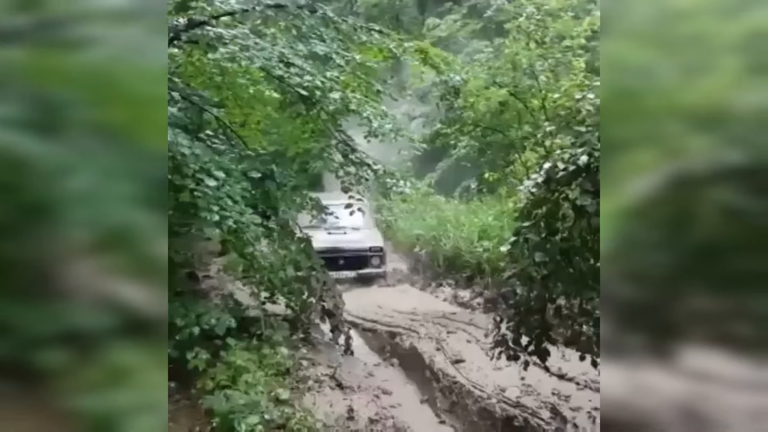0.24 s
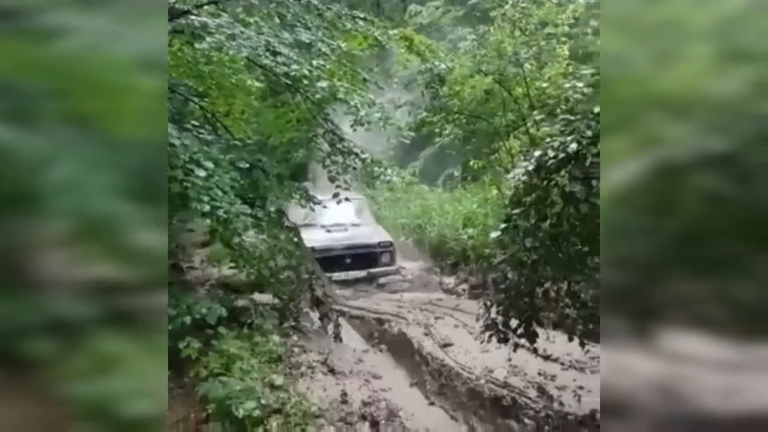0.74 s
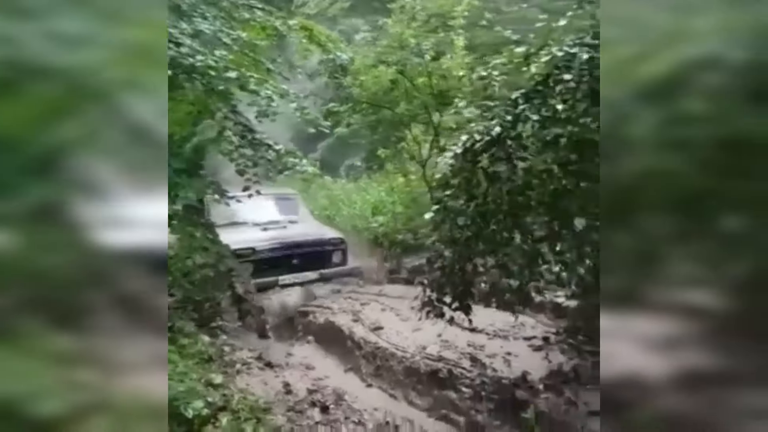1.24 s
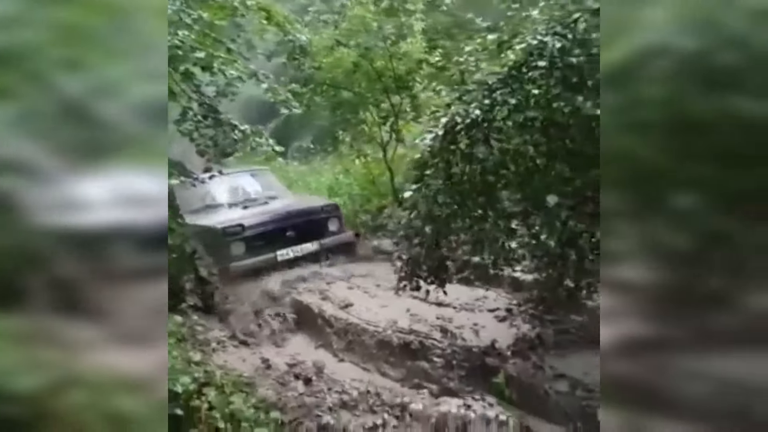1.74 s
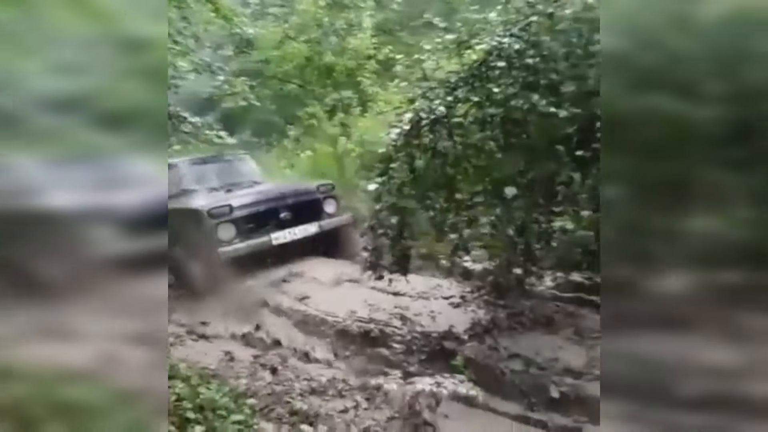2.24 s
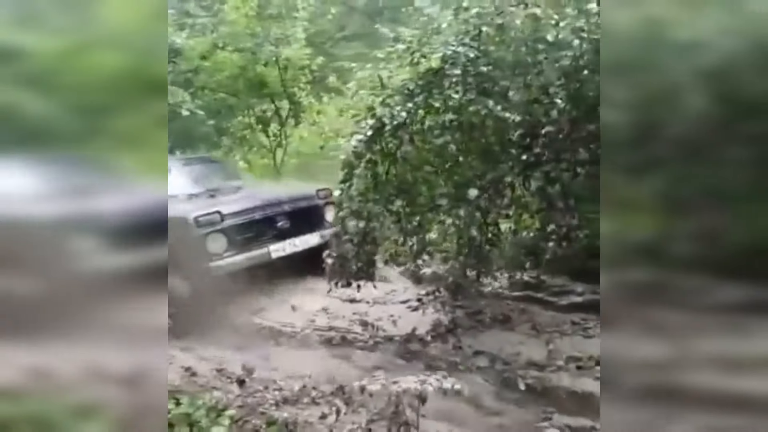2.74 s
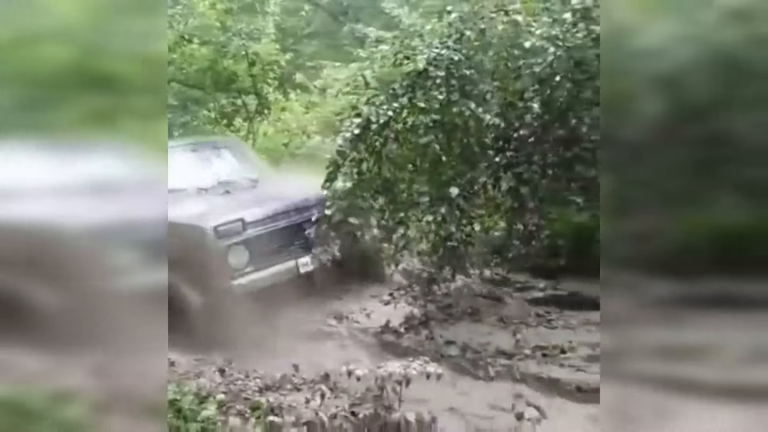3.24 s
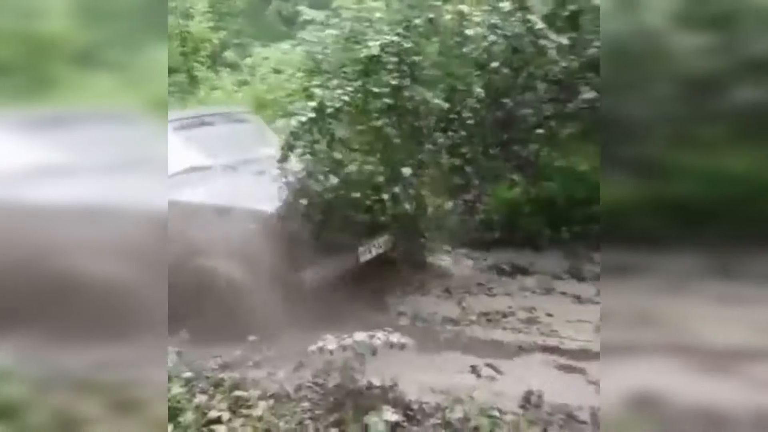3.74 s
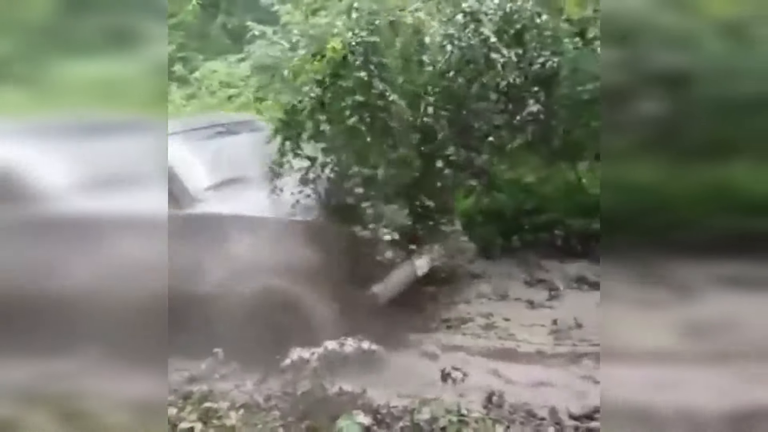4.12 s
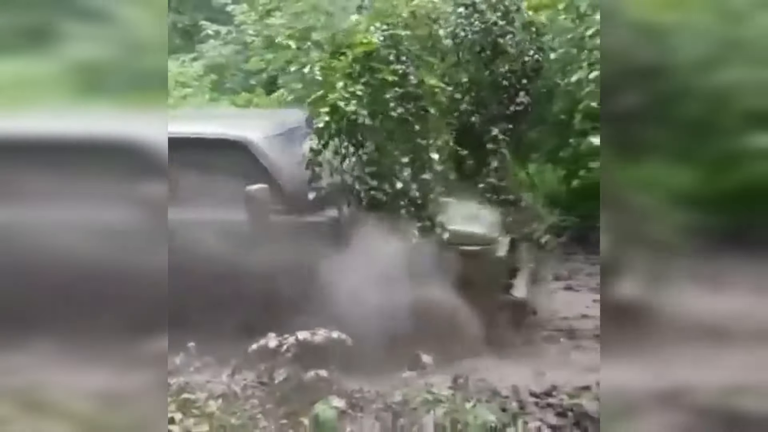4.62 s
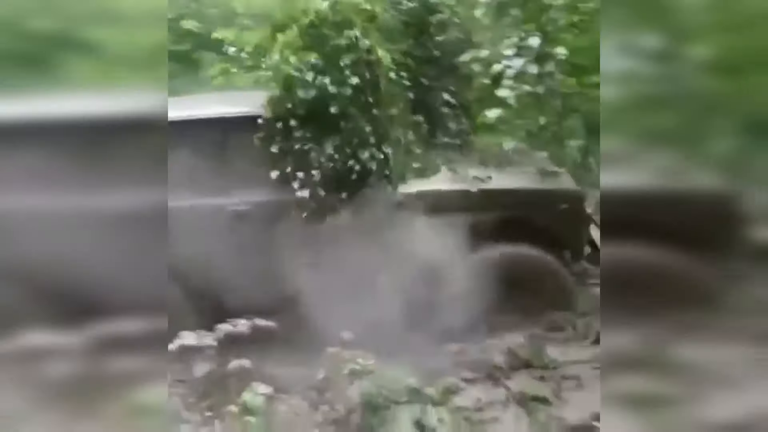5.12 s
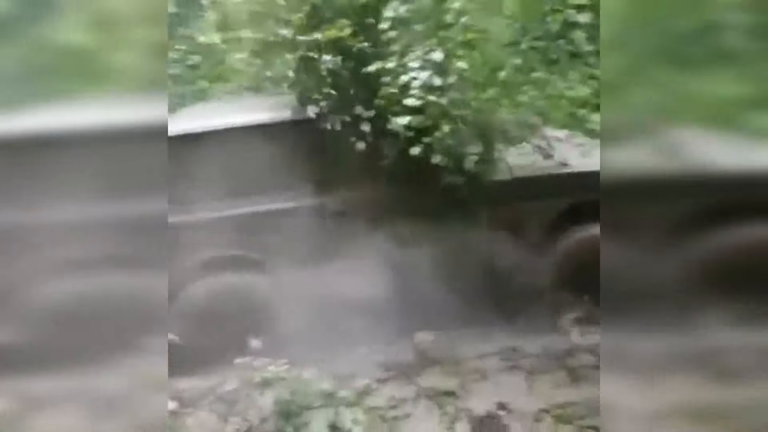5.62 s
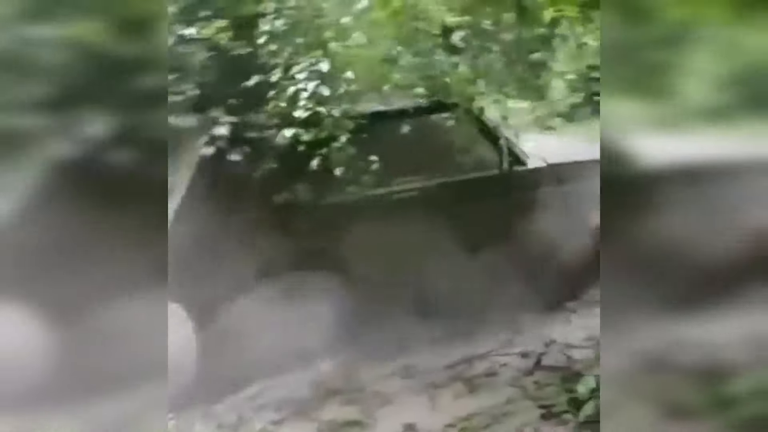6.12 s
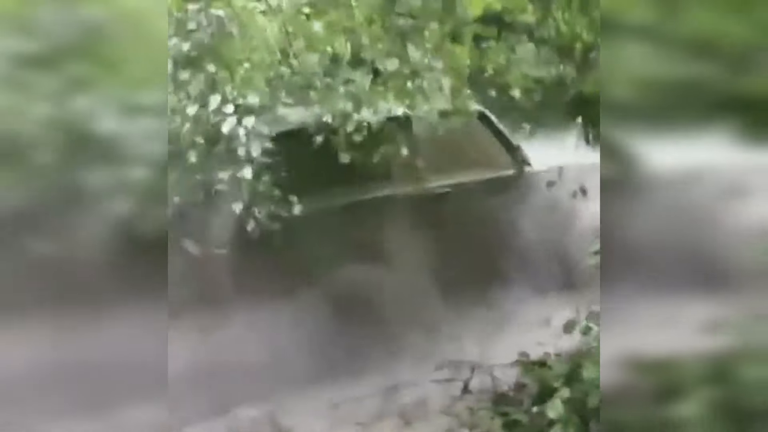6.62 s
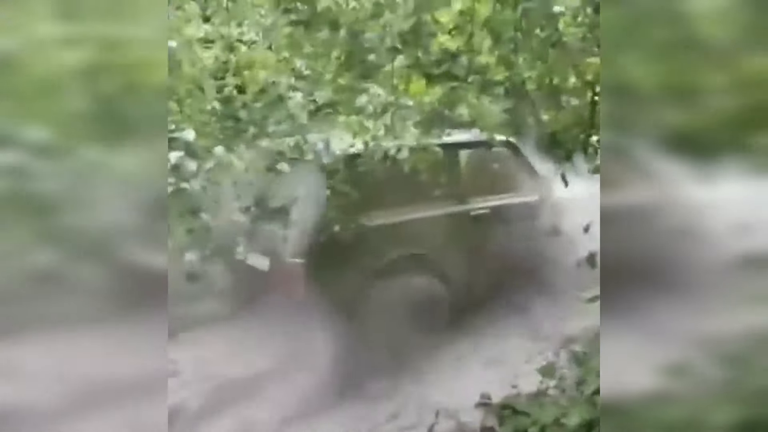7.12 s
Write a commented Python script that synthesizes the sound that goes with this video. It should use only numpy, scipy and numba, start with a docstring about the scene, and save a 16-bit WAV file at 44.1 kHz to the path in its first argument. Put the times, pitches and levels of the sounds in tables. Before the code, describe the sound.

After a brief silence, wet mud churns and a leaf-muffled engine cuts in, then the off-roader roars slowly past at full throttle, booming and spraying slurry.

```python
"""Churning mud and an engine still muffled by leaves cut in, then an off-roader claws past at full throttle.
The four firings of each cycle drive every engine tone: a near-pure pipe boom climbing towards 190 a second,
rough overtones that flutter and ring out, a clattering block, a moving rasp and brief accessory whines.
The wheels' slurry is made of dense random impacts, coloured and split into bands, with short ringing grains;
it surges with each dig, while a hollow from the ground echo drifts through the treble."""
import sys
import numpy as np
from scipy import signal
from scipy.fft import rfft, irfft
from scipy.io import wavfile
from scipy.ndimage import map_coordinates
from numba import njit

SR = 44100
rng = np.random.default_rng(int(sys.argv[2]) if len(sys.argv) > 2 else 0)


def to_wav(sig):
    """Store sig (one row per channel, or 1-D mono) as 16-bit WAV at the path in sys.argv[1].

    Samples outside -1..1 are clipped; the rate is SR.
    """
    pcm = np.clip(np.atleast_2d(sig), -1, 1) * 32767
    pcm = np.round(pcm).astype(np.int16)
    wavfile.write(sys.argv[1], SR, pcm.T)  # frames by channels


N = 325458
TIME = np.arange(N) / SR  # seconds
FULL_BOOM_DB = -13  # the boom with the pipe in full song


def undb(db):
    """Decibels to gain."""
    return 10 ** (np.asarray(db) / 20)


def unit(x):
    """Scale to rms 1."""
    return x / np.sqrt(np.mean(x ** 2))


def curves(table):
    """Each column after the time column, drawn as straight lines with one value per sample."""
    s, *columns = np.transpose(table)
    return [np.interp(TIME, s, column) for column in columns]


def swell(s, length_s):
    """A smooth bell-shaped rise and fall, 1 at time s and 1/e at length_s to either side."""
    return np.exp(-((TIME - s) / length_s) ** 2)


def walk(rate):
    """Smooth random wandering with rms 1: noise that dies away above about rate in Hz."""
    hz = np.arange(N // 2 + 1) * SR / N
    spectrum = rfft(rng.standard_normal(N)) * np.exp(-(hz / rate) ** 2)
    return unit(irfft(spectrum, N))


def colour(x, points):
    """Filter by an outline of (Hz, dB) points, joined on a logarithmic pitch scale."""
    hz, db = np.transpose(points)
    bins = np.arange(N // 2 + 1) * SR / N + 1  # the 1 avoids log(0)
    return irfft(rfft(x) * undb(np.interp(np.log(bins), np.log(hz), db)), N)


def band(x, lo_hz, hi_hz):
    """Band-pass with steep sides."""
    edges = [lo_hz, min(hi_hz, SR / 2 - 1)]
    return signal.sosfilt(signal.butter(4, edges, "band", fs=SR, output="sos"), x)


@njit
def resonance(x, hz, width):
    """State-variable band-pass whose centre may move; gain 1 at the centre, width in Hz."""
    y, b, low = np.empty(len(x)), 0., 0.
    for i in range(len(x)):
        g, k = np.tan(np.pi * hz[i] / SR), width / hz[i]
        v = (b + g * (x[i] - low)) / (1 + g * (g + k))
        b, low, y[i] = 2 * v - b, low + 2 * g * v, k * v
    return y


def passing():
    """How openly the engine is heard (dB, lower with distance and leaves) and which end shows (1 nose, -1 tail)."""
    nearest_s, closest_m, crawl_m_s = 4.63, 2.75, 0.83
    foliage_db, clears_s, clearing_s = -16, 1.09, 0.21  # leaves screen the engine until it noses out
    ahead_m = crawl_m_s * (nearest_s - TIME)
    distance_m = np.hypot(closest_m, ahead_m)
    hidden = (1 - np.tanh((TIME - clears_s) / clearing_s)) / 2
    open_db = 20 * np.log10(closest_m / distance_m) + foliage_db * hidden
    return open_db, ahead_m / distance_m


def digging():
    """Extra effort in dB as the wheels dig in: each dig builds up, holds and lets go."""
    # Each row: start in seconds, rise in seconds, end of the hold in seconds, strength in dB.
    digs = [(.36, 0.23, 0.83, 0.5), (1.25, 0.75, 2.2, 4), (3.38, 0.062, 3.7, 3), (3.76, 0.3, 4.23, 3.5),
            (5.0, .55, 6.1, 2.5)]
    release_s = 0.18
    effort_db = 0
    for start, rise, end, db in digs:
        build = np.clip((TIME - start) / rise, 0, 1)
        let_go = np.clip(1 - (TIME - end) / release_s, 0, 1)
        effort_db = effort_db + db * build * let_go
    return effort_db


def patter(rate, spread_db, ring_s):
    """Dense impacts, rate a second, a few much bigger than the rest; each is a burst of noise
    whose energy decays over ring_s."""
    struck = rng.random(N) < rate / SR
    size = undb(spread_db * np.minimum(rng.exponential(size=N), 5))
    hits = struck * size * rng.standard_normal(N)
    energy = signal.lfilter([1], [1, -np.exp(-1 / (ring_s * SR))], hits ** 2)
    return unit(np.sqrt(energy) * rng.standard_normal(N))


def ringing_grains(ring_s, spread_db, glide, count):
    """Short ringing grains at random pitches through the slurry, each rising very slightly."""
    # Tone of the grains together. Each row: frequency in Hz, relative level in dB.
    grain_tone = [(350, -14), (600, 0), (1000, -1.5), (1700, -1.5), (2700, -2), (3400, -8.5), (5000, -10.5),
                  (8000, -16.5)]
    out, age = np.zeros(N + SR), np.arange(int(.07 * SR)) / SR
    for when, pitch, size, life in rng.random((count, 4)):
        hz = 350 * (8000 / 350) ** pitch  # 350 to 8000 Hz, even in octaves
        decay_s = ring_s * (.5 + life)
        shape = np.exp(-age / decay_s) * (1 - np.exp(-2 * age / decay_s))
        ring = np.sin(2 * np.pi * hz * age * (1 + glide * age))
        start = int(when * N)
        out[start:start + len(age)] += undb(spread_db * size) * shape * ring
    return unit(colour(out[:N], grain_tone))


def gulps(width_hz):
    """Pockets of slurry collapse under the tyres: swells of noise, each through a narrow hollow resonance."""
    # Each row: centre in seconds, pitch in Hz, swell length in seconds, level in dB.
    pockets = [(0.608, 420, 0.063, -27.5), (1.615, 360, 0.14, -30.5), (4.18, 305, .07, -37)]
    out = 0
    for s, hz, length, db in pockets:
        hollow = resonance(rng.standard_normal(N), np.full(N, float(hz)), float(width_hz))
        out = out + undb(db) * unit(hollow) * swell(s, length)
    return out


def mud(firings, dig_db, boom_db, facing, spray_db, grains_db, rumble_db, pulsing):
    """Slurry torn up by the treads: random impacts split into thuds, lumps, churning, splashes and spray,
    with grains and a plume; most layers surge with the digs, and the middle carries the engine's pulsing rush."""
    # Flow between digs. Each row: time in seconds, churning in dB, splashing in dB.
    flow = [(0.23, -33, -30.5), (0.85, -29, -30), (1.5, -31.5, -31.5), (2.6, -36.5, -32.5),
            (4.9, -36.5, -30.5), (6.6, -33, -34.5), (7.3, -42, -36.5)]
    # Heavy slop under the body between digs. Each row: time in seconds, level in dB.
    body_slop = [(.23, -41), (.9, -42), (1.35, -40.5), (1.7, -42), (2.1, -41), (2.5, -50), (2.8, -44),
                 (3.3, -40.5), (3.9, -44), (4.25, -42), (4.55, -45), (5.0, -37), (5.5, -34.5), (6.1, -37.5),
                 (6.7, -41), (7.15, -46)]
    # Tone of the wet impacts. Each row: frequency in Hz, relative level in dB.
    slurry_tone = [(20, -22), (50, -12.5), (100, -11), (170, 11.5), (300, 11.5), (450, -6), (700, -4.5),
                   (1100, -5.5), (1700, -3), (2700, -5.5), (3400, -9.5), (5000, -14.5), (6500, -16.5),
                   (8300, -12.5)]
    # Dull thuds as the body drops into a rut. Each row: centre in seconds, level in dB.
    jolts = [(.28, -37), (1.6, -52), (2.08, -42), (3.54, -41), (3.78, -49), (4.18, -41), (5.82, -44)]
    jolt_s, front_rumble_db = 0.14, 2.5  # swell length; extra rumble when the grille faces the listener
    plume_s, plume_width_s, plume_db = 5.55, .7, -41  # fine spray off the near wheel

    churn_db, splash_db = curves(flow)
    lump_db, = curves(body_slop)
    rumble = undb(rumble_db + 0.17 * (boom_db - FULL_BOOM_DB) + front_rumble_db * facing)
    thuds = rumble + sum(undb(db) * swell(s, jolt_s) for s, db in jolts)

    slop = colour(patter(rate=11000, spread_db=0.5, ring_s=0.0087), slurry_tone)
    drops = colour(patter(rate=9000, spread_db=4.0, ring_s=0.0083), slurry_tone)
    grains = ringing_grains(ring_s=0.0096, spread_db=9.5, glide=0.33, count=3000)
    mist = patter(rate=9000, spread_db=2.5, ring_s=.005)
    # pulses at the firing rate and at half of it
    rush = 1 + pulsing * (np.sin(2 * np.pi * firings) + .6 * np.sin(np.pi * firings))

    layers = [
        (band(slop, 22, 125), thuds * undb(1.2 * walk(7.2))),
        (band(slop, 154.0, 402), undb(lump_db + 1.2 * dig_db + 1.0 * walk(3.0))),
        (band(slop, 424, 1112) * rush, undb(churn_db + 1.0 * dig_db + 0.4 * walk(11))),
        (band(slop, 1220, 3070) * rush, undb(splash_db + 1.19 * dig_db + 0.35 * walk(24))),
        (grains, undb(splash_db + grains_db + .8 * dig_db)),
        (band(mist, 2900, 5200), undb(plume_db) * swell(plume_s, plume_width_s)),
        (band(drops, 3340, 7900), undb(spray_db + 0.66 * splash_db + 1.02 * dig_db + 0.68 * walk(13)))]
    return sum(unit(x) * gain for x, gain in layers)


def whine(firings):
    """A belt-driven accessory sings far above the firing rate, a thin tone that swells and fades."""
    # Each row: centre in seconds, swell length in seconds, level in dB before the random wavering.
    swells = [(2.56, .04, -45), (2.77, 0.034, -40), (2.95, .055, -35.5), (3.14, .04, -38),
              (3.33, 0.07, -43), (4.65, 0.15, -42.5), (5.65, 0.16, -41)]
    level = sum(undb(db) * swell(s, length) for s, length, db in swells)
    angle = 2 * np.pi * 15.05 * firings
    return level * undb(2 * walk(18)) * np.sqrt(2) * np.sin(angle + 0.37 * walk(25))


def knocks(firings, scatter, count):
    """A random knock pattern that repeats every count firings and slowly changes, more with scatter."""
    size = 1024  # points in one pattern
    place = firings / count * size
    fresh = rng.standard_normal((int(place[-1] / size) + 2, size))
    keep = np.clip(1 - scatter, 0, .98)
    cycles = signal.lfilter([1], [1, -keep], fresh, axis=0).ravel()
    return map_coordinates(cycles, [place], order=3)


def clatter(firings, db):
    """Valves and combustion, repeating every four firings, as the whole block radiates them."""
    # Tone of the block. Each row: frequency in Hz, relative level in dB.
    block_tone = [(250, -36), (440, -18.5), (560, 3), (800, -4.5), (1400, -0.5), (2000, -1.5), (2800, -4.5),
                  (3400, -12.5), (5000, -12.5), (6300, -17), (9000, -43)]
    valves = knocks(firings, scatter=.12, count=4)
    return undb(db) * unit(colour(valves, block_tone))


def rasp(firings, width_hz):
    """Pistons knock alike on every turn of the crank and ring the engine bay: a narrow, rough band."""
    # The band moves as grille, side and tail turn past.
    # Each row: time in seconds, centre in Hz, level in dB before distance, leaves and digs.
    engine_bay = [(.23, 1090, -33), (1.55, 1123, -27.5), (2.0, 1214, -31.5), (2.5, 1330, -30.5),
                  (2.8, 1350, -34), (3.2, 1380, -29.5), (3.65, 1490, -37), (4.05, 1424, -31),
                  (4.3, 1132, -31.5), (4.6, 1380, -41.5), (5.05, 1807, -33), (5.4, 1899, -33.5),
                  (5.65, 1844, -33), (6.0, 1730, -30.5), (6.3, 1470, -36), (6.55, 947, -33.5),
                  (7.3, 1000, -32)]
    centre_hz, db = curves(engine_bay)
    pistons = knocks(firings, scatter=.12, count=2)
    once = resonance(pistons, centre_hz, float(width_hz))
    twice = resonance(once, centre_hz, float(width_hz))
    return undb(db) * unit(twice)


def growl(firings, drive_db, fade_db, flutter_db):
    """Rough engine overtones: each flutters as the paths through the trees shift, and some ring out."""
    # Each row: multiple of the firing rate, steady peak level in dB before drive, fading and flutter.
    overtones = [(1.25, -44.5), (1.5, -47.5), (1.75, -46.5), (2.5, -55.5), (3, -47), (3.25, -55),
                 (3.5, -43.5), (4, -39.5), (4.25, -43.5), (4.5, -45.5), (4.75, -59.5), (5, -51.5),
                 (5.5, -52.5), (6, -47.5), (6.5, -50), (6.75, -50.5), (7, -44), (7.5, -49), (8, -48),
                 (8.25, -47.5), (8.5, -45.5), (9, -49), (9.25, -51), (9.5, -52), (11, -53), (12.25, -50.5),
                 (12.75, -48.5)]
    # Overtones meeting a resonance of the body or intake. Each row: centre in seconds,
    # multiple of the firing rate, swell length in seconds, peak level in dB before flutter.
    rings = [(1.64, 3.5, 0.18, -28), (1.8, 4, 0.11, -26.5), (1.81, 1.75, .15, -35), (1.848, 3, 0.13, -27.5),
             (2.02, 8, .1, -37), (2.02, 7.5, 0.088, -36), (2.03, 3.25, .1, -32), (2.068, 3.5, 0.11, -31),
             (2.1, 4.5, .12, -32), (2.2, 4.25, 0.25, -33), (2.53, 3.5, 0.14, -33.5), (2.8, 6, .27, -37),
             (3.05, 4, .17, -42), (3.087, 7.5, 0.16, -39), (3.25, 3, .2, -36), (3.44, 4, .1, -30),
             (3.645, 3.5, .13, -28), (3.66, 3, 0.15, -38), (3.698, 8.5, .14, -32.5),
             (3.708, 12.25, .13, -35), (3.76, 8.25, 0.15, -35), (3.86, 4.25, 0.089, -32),
             (4.037, 3.5, .08, -30), (4.077, 6.5, 0.12, -39.5), (4.196, 8.25, .11, -32),
             (4.304, 5.5, .12, -33), (4.357, 3.5, 0.14, -31.5), (4.6, 6, .13, -38), (4.7, 7, 0.16, -32.5),
             (4.714, 4, .12, -35), (4.903, 3, 0.41, -34), (5.037, 9, 0.18, -38), (5.3, 7, 0.11, -36.5),
             (5.353, 11, 0.17, -44), (5.448, 1.5, .2, -33.5), (5.546, 1.75, .35, -38), (5.64, 4, .15, -32),
             (5.753, 9.5, .2, -37), (5.89, 8.5, 0.085, -38), (5.93, 9.25, 0.11, -32.5),
             (5.97, 6.75, 0.17, -32), (6.015, 9, .14, -32), (6.03, 7, 0.27, -33.5), (6.044, 3, 0.25, -30.5),
             (6.09, 4, .1, -29.5), (6.1, 1.25, .12, -32), (6.15, 4.75, .12, -30), (6.186, 2.5, .12, -35),
             (6.5, 4.5, .17, -35), (6.56, 4.75, .12, -35.5), (6.63, 5, 0.15, -35),
             (6.656, 7.5, 0.14, -36.5), (6.935, 7, .16, -37), (7.253, 4.25, 0.21, -36.5)]
    ring_flutter = 0.56  # share of the flutter left while an overtone rings
    out = 0
    for multiple, line_db in overtones:
        steady = undb(line_db + drive_db + fade_db * walk(2.2))
        ringing = sum(undb(db) * swell(s, length) for s, which, length, db in rings
                      if round(4 * which) == round(4 * multiple))
        angle = 2 * np.pi * (multiple * firings + rng.random()) + .2 * walk(22)
        flutter = flutter_db * walk(30)
        level = np.hypot(steady * undb(flutter), ringing * undb(ring_flutter * flutter))
        out = out + level * np.sin(angle)
    return out


def exhaust(firings, boom_db, facing, tailpipe):
    """The pipe's boom, nearly a pure tone, with crank throb and cylinder lope below and the octave above."""
    # The octave above the firing rate. Each row: time in seconds, level in dB before wavering.
    octave_levels = [(.23, -54), (1.75, -35.5), (2.15, -38), (2.5, -50.5), (2.68, -38.5), (2.8, -42),
                     (2.92, -44), (3.05, -31.5), (3.25, -38), (3.5, -39.5), (3.8, -37.5), (4.15, -38),
                     (4.5, -52), (4.8, -45.5), (5.1, -28.5), (5.4, -30.5), (5.58, -25), (5.9, -29.5),
                     (6.15, -38), (6.35, -34), (6.9, -39), (7.15, -53)]
    throb_db, lope_below_db = -40.5, -32.5  # throb at full boom, seen from the side; lope relative to the boom
    front_throb_db, tail_lope_db = 5, 13.5  # extra throb from the grille, extra lope from the tailpipe
    crank_db = throb_db + .7 * (boom_db - FULL_BOOM_DB) + front_throb_db * facing
    lope_db = boom_db + lope_below_db + tail_lope_db * tailpipe
    octave_db, = curves(octave_levels)
    angle = 2 * np.pi * firings
    boom = undb(boom_db + 0.63 * walk(28)) * np.sin(angle)
    throb = undb(crank_db + 2.3 * walk(25)) * np.sin(angle / 2 + .22 * walk(20))
    octave = undb(octave_db + 1.7 * walk(19)) * np.sin(2 * angle + 0.24 * walk(20))
    lope = undb(lope_db + 2.5 * walk(20)) * np.sin(angle * 3 / 4 + .45 * walk(20))
    return np.sqrt(2) * (boom + throb + octave + lope)  # sine levels are rms


def ground(x, width_hz):
    """Direct sound and ground echo partly cancel in one band that shifts as the vehicle moves."""
    # Each row: time in seconds, centre in Hz, depth from 0 to 1.
    hollow = [(.23, 2680, 0.6), (1.45, 2830, 0.32), (1.9, 2460, 0), (2.2, 1830, 0.2), (3.2, 1930, .42),
              (3.5, 2201, 0), (4.1, 2500, 0.4), (4.5, 2580, 0.37), (5.7, 2620, 0.3), (6.05, 2498, 0),
              (6.7, 2150, .1), (7.2, 2080, 0.36)]
    centre_hz, depth = curves(hollow)
    return x - np.clip(depth, 0, 1) * resonance(x, centre_hz, float(width_hz))


def scene():
    """Wheels and engine, driven by the firing rate, the digs and the slow pass."""
    # Engine speed, sagging where the tyres bite. Each row: time in seconds, mean firing rate in Hz.
    speed = [(0.26, 148.6), (0.94, 170), (1.13, 165), (1.28, 173.2), (1.4, 168.6), (1.48, 174.7),
             (2.07, 176.9), (2.58, 183.1), (2.82, 182.2), (2.98, 185.6), (3.46, 187.9), (3.59, 177.2),
             (3.89, 181.2), (4.01, 170.9), (4.12, 173), (4.23, 173), (4.51, 185.2), (4.73, 189.5),
             (5.27, 190.6), (5.43, 194.6), (5.56, 195.5), (5.94, 196.5), (6.13, 195.2), (6.33, 194.6),
             (6.41, 192.4), (6.75, 190.2), (7.02, 187.2), (7.34, 186.8)]
    # Boom at the firing rate. Each row: time in seconds, level in dB before wavering.
    boom_levels = [(0.24, -20), (0.32, -27), (0.4, -20), (0.46, -33), (0.52, -35), (0.56, -27),
                   (0.64, -35.5), (1.07, -30.5), (1.15, -37.5), (1.19, -31), (1.23, -38.5), (1.59, -25.5),
                   (1.77, -29.5), (1.85, -24), (2.14, -11.5), (2.26, -9), (3.39, -9.5), (3.45, -16),
                   (3.59, -18), (3.81, -12.5), (3.91, -17.5), (4.22, -14.5), (4.36, -9.5), (5.3, -13.5),
                   (5.34, -16), (5.43, -11), (5.53, -14), (6.07, -11.5), (6.33, -9.5), (6.63, -11.5),
                   (6.74, -9), (7.36, -10.5)]
    front_growl_db = 0.5  # extra growl when the grille faces the listener
    hz, = curves(speed)
    boom_db, = curves(boom_levels)
    open_db, facing = passing()
    dig_db = digging()
    tailpipe = swell(5.73, 0.71)  # the tailpipe swings towards the listener
    firings = np.cumsum(hz * (1 + 0.0012 * walk(12.016))) / SR  # running count, slightly uneven

    wheels = mud(firings, dig_db, boom_db, facing, spray_db=-19.4, grains_db=-2, rumble_db=-41.5, pulsing=0.13)
    wheels = wheels + gulps(width_hz=68)
    engine = clatter(firings, db=-32.0) + rasp(firings, width_hz=740)
    drive_db = open_db + dig_db
    overtones = growl(firings, drive_db + front_growl_db * facing, fade_db=1.4, flutter_db=3.0)
    pipe = exhaust(firings, boom_db, facing, tailpipe)
    upper = ground(overtones + undb(drive_db) * engine + wheels, width_hz=250)
    return (pipe + upper + whine(firings))[None]


def record(dry):
    """After a short silence the sound cuts in abruptly; a steep low-pass removes the top."""
    start_s, top_hz = .229, 8550
    opened = np.clip((TIME - start_s) / .003, 0, 1)
    return signal.sosfilt(signal.ellip(8, .2, 80, top_hz, fs=SR, output="sos"), dry * opened)


dry = scene()
out = record(dry)
to_wav(out)
```